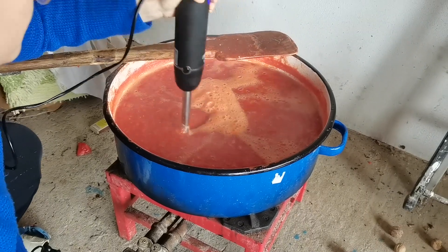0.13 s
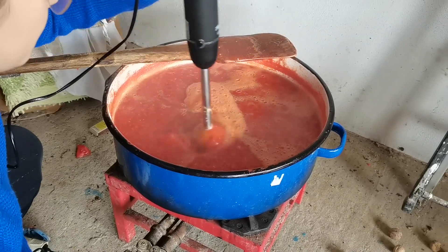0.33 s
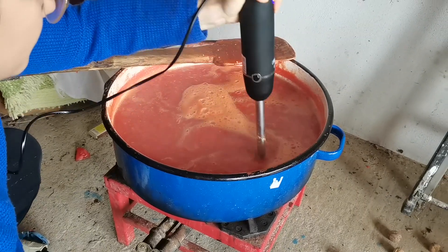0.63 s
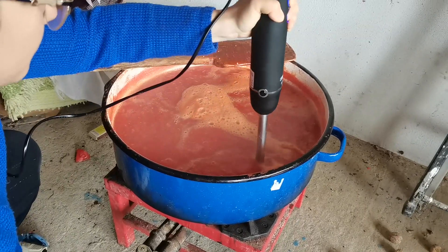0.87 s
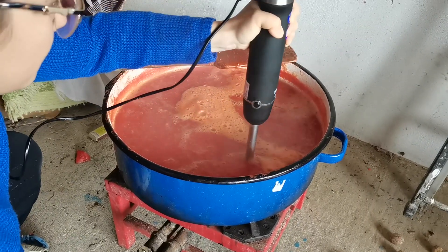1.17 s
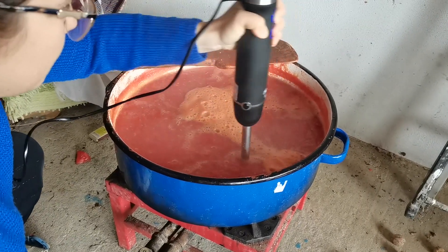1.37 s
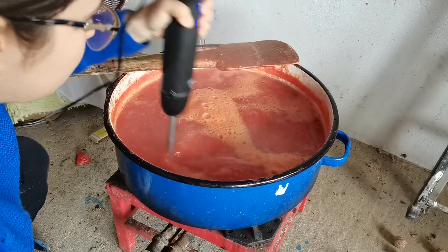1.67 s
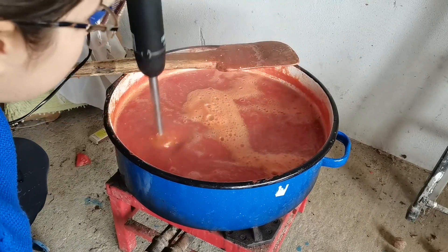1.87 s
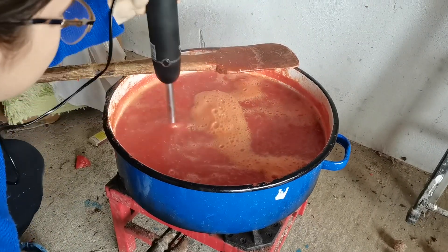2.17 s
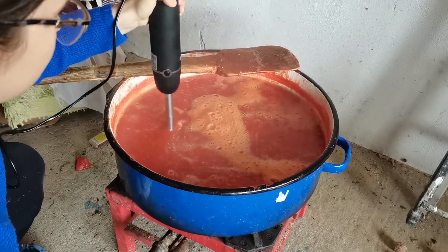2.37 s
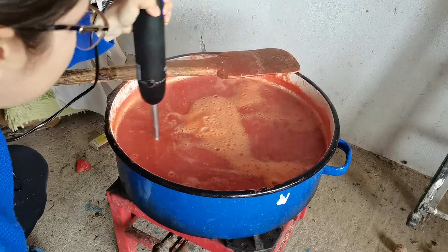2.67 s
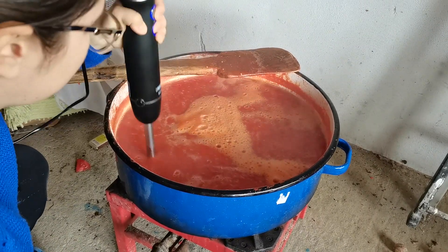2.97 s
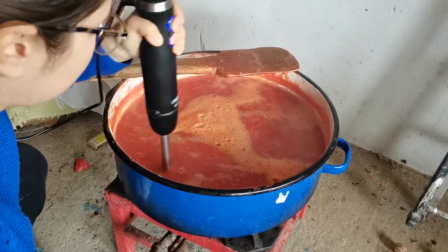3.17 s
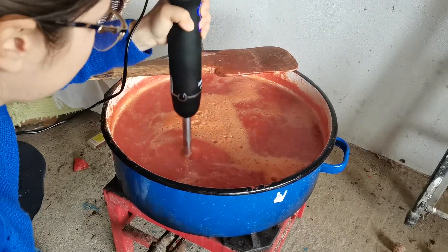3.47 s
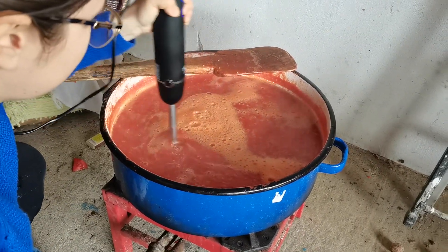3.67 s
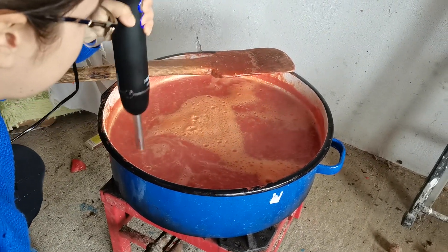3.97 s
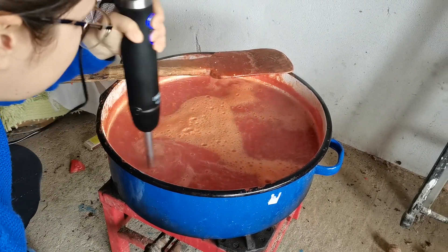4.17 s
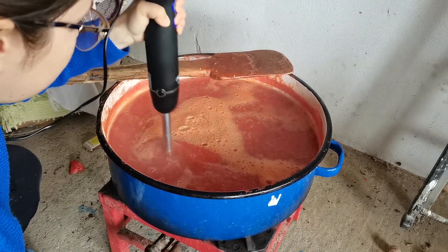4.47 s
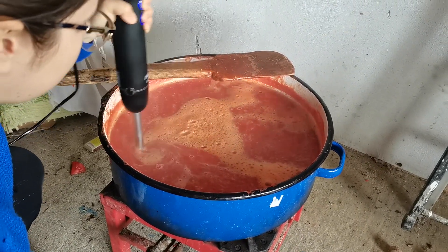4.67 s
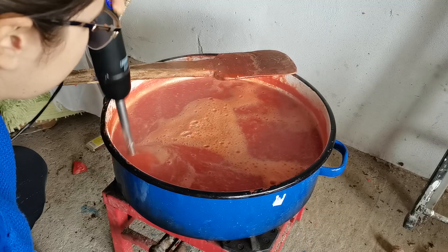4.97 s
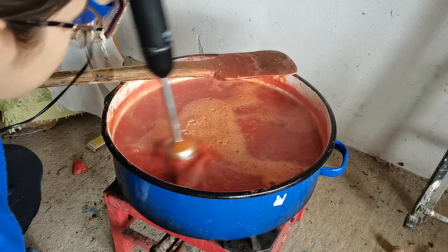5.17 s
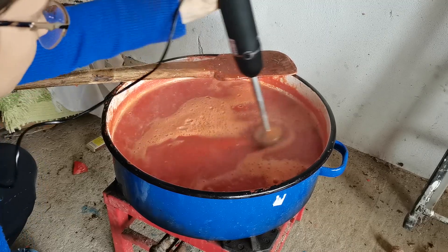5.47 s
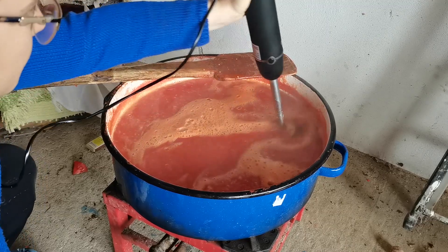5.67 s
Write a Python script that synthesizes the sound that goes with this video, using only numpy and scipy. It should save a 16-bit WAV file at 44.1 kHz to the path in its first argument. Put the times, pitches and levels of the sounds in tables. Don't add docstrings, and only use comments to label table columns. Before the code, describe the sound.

Close stereo pickup of a stick blender in a pot of thick red sauce. A falling whine opens, then a short burst with a hum and a sudden wet hiss, a glide down, a long stirring burst, and another run-down. Drops spatter and plop, and finally the lifted blades start up, lighter and drier. A gas flame rushes faintly beneath in a plain, fairly dry room.

```python
import sys
import numpy as np
from scipy import signal
from scipy.fft import rfft, irfft, next_fast_len
from scipy.io import wavfile
from scipy.ndimage import uniform_filter1d, map_coordinates

SR = 44100
rng = np.random.default_rng(int(sys.argv[2]) if len(sys.argv) > 2 else 0)


def boost(x):
    u = np.asarray(x, float) / 20
    return 10 ** u


def dump(signal):
    limited = np.clip(np.atleast_2d(signal).T, -1, 1)
    pcm = np.round(limited * 32767).astype(np.int16)
    wavfile.write(sys.argv[1], SR, pcm)


N = 256220


def unit(x):
    return x / np.sqrt(np.mean(x ** 2) + 1e-20)


def along(points, hz):
    f, v = np.transpose(points)
    return np.interp(np.log(hz + 1), np.log(f + 1), v)


def curves(rows, at=None):
    s, *cols = np.transpose(sorted(map(tuple, rows)))
    at = np.arange(N) / SR if at is None else at
    return [np.interp(at, s, c) for c in cols]


def wobble(rate_hz):
    knots = rng.standard_normal(int(N * 900 / SR) + 4)
    return map_coordinates(knots, [np.arange(N) * min(rate_hz, 900) / SR])


def rise(s, tau_s):
    return 1 - np.exp(-np.maximum(s, 0) / tau_s)


def bump(s, width_s):
    return np.exp(-(s / width_s) ** 2)


def filtered(x, response):
    m = next_fast_len(N + SR // 2)
    return irfft(rfft(x, m) * response(np.fft.rfftfreq(m, 1 / SR)), m)[..., :N]


# frequency in Hz, left-right correlation.
PORT_LIKENESS = [(60, 0.83), (180, 0.79), (550, 0.61), (1650, 0), (4970, 0.088), (15000, 0.15)]


def rush(spectrum, patchy_db):
    z = signal.stft(rng.standard_normal((2, N)), nperseg=512)[2]
    field = uniform_filter1d(rng.standard_normal(z.shape[1:]), size=8, axis=0)
    field = uniform_filter1d(field, size=8, axis=1)
    pair = signal.istft(z * boost(patchy_db * unit(field)), nperseg=512)[1][:, :N]

    def mid_side(hz):
        turn = np.arccos(np.clip(along(PORT_LIKENESS, hz), -1, 1)) / 2
        return boost(along(spectrum, hz)) * [np.cos(turn), np.sin(turn)]

    mid, side = filtered(pair, mid_side)
    return unit(np.array([mid + side, mid - side]))


def tone(phase, rough, width_hz, apart):
    skirt = np.array([wobble(width_hz) + 1j * wobble(width_hz) for port in range(2)])
    lag = apart * (wobble(2.98) + 1.15) * np.array([[1], [-1]])
    return unit(-np.real((1 + rough * skirt) * np.exp(1j * (phase - lag))))


# press in s, bell starts drawing air in s, release in s, lifted share 0-1.
PRESSES = [
    (-1, -.9, -.233, 0),
    (.593, .972, 1.207, 0),
    (2.011, 2.266, 4.646, 0),
    (5.593, 9, 9, 1),
]


def clocks():
    t = np.arange(N) / SR
    columns = np.transpose(PRESSES)
    latest = np.searchsorted(columns[0], t, "right") - 1
    press, air, release, lifted = columns[:, latest]
    return t - press, t - air, np.maximum(t - release, 0), np.minimum(t, release), lifted


# time in s, speed in rev/s.
LOADED_SPEED = [(.8, 225), (.96, 226), (1.04, 224), (1.1, 231), (1.21, 232), (2.25, 224.5), (2.3, 224),
                (2.4, 230), (2.5, 232.5), (2.7, 234.5), (3.0, 233.5), (3.15, 235.7), (3.9, 235.5),
                (4.63, 234.6), (5.76, 242), (5.81, 236)]
SPIN_UP_S, HEAD_START_S = (.037, .027), (.016, -.012)
DRAG_LOSS_REV_S, DRAG_S, FRICTION_REV_S2, CRAWL_REV_S = 72, .075, 320, 15


def shaft():
    on, air, off, held, lifted = clocks()
    head_start = np.interp(lifted, [0, 1], HEAD_START_S)
    share = np.maximum(rise(on + head_start, np.interp(lifted, [0, 1], SPIN_UP_S)), .05)
    driven = curves(LOADED_SPEED, held + 2 * (held < 0))[0] * share
    speed = driven - DRAG_LOSS_REV_S * rise(off, DRAG_S) - FRICTION_REV_S2 * off
    return np.maximum(speed, CRAWL_REV_S), 20 * np.log10(share)


# time in s, blade beat in dB, its 2nd partial in dB, its 3rd partial in dB.
STROKES = [
    [(.7, -14, -33, -39), (.806, -21, -30, -41), (.85, -16, -34, -35), (.934, -23.5, -26, -47.5),
     (1.038, -24, -46, -31), (1.088, -29.5, -17.5, -27), (1.152, -22.5, -39, -25),
     (1.21, -23.5, -20, -27.5)],
    [(2.11, -17, -22.5, -40.5), (2.24, -19, -31, -50), (2.37, -11, -13.5, -24.5), (2.48, -18.5, -26, -25.5),
     (2.65, -24, -11, -34.5), (2.8, -18.5, -30, -42), (2.95, -24.5, -15, -30), (3.11, -17.5, -33.5, -26),
     (3.2, -21.5, -35, -52), (3.28, -28, -19, -31), (3.4, -37, -28, -34.5), (3.55, -20.5, -31.5, -33),
     (3.65, -37.5, -31, -27), (3.71, -18, -28, -27.5), (3.8, -17, -19.5, -36), (4.24, -25.5, -27.5, -30),
     (4.48, -24.5, -25, -31.5), (4.58, -18, -20.5, -37.5)],
    [(5.728, -45, -59, -56), (5.784, -26.5, -55, -60), (5.81, -21, -39, -49)],
]
BEAT_POWER = (9, 6, 6)
BEAT_DROP_DB, BEAT_DROP_S, BEAT_FADE_DB_S2 = (10, 7, 18), .03, (560, 4000, 3000)
FADES_DB, FLUTTER_DB, DRY_DB = (1, 1.5, 2), 12, -46


def blade_levels(hiss_db, spin_db):
    on, air, off, held, lifted = clocks()
    choppy_s = .08
    drop = rise(off, BEAT_DROP_S)
    stumble = drop + bump(air - choppy_s / 2, choppy_s)
    strokes = curves([row for burst in STROKES for row in burst], held)
    beats = []
    for db, power, drop_db, fade, fades_db in zip(strokes, BEAT_POWER, BEAT_DROP_DB, BEAT_FADE_DB_S2, FADES_DB):
        level = db + power * spin_db - drop_db * drop - fade * off ** 2
        flutter = FLUTTER_DB * stumble * np.minimum(wobble(45), .2)
        beats.append(level + fades_db * wobble(9) + flutter)
    return beats + [hiss_db - 8 * drop, DRY_DB + 4 * spin_db - 80 * (1 - lifted)]


# multiple of shaft speed, level in dB against its driver,
# driver (0-2 blade partials, 3 hiss, 4 dry spin).
WEAK_ORDERS = [(1, -20, 0), (3, -23, 0), (5, -26, 1), (8, -1, 2), (7, -24, 3), (10, -13, 3), (7, 4, 4),
               (8, 1, 4), (12, -8, 4), (22, -5, 4), (24, 0, 4), (26, -5, 4)]


def blades(turns, drivers_db):
    orders = [(2 * k + 2, 0, k) for k in range(3)]
    orders += [(round(order), db, round(driver)) for order, db, driver in WEAK_ORDERS]
    total = 0
    for order, db, driver in orders:
        line = tone(order * turns, rough=0.079 * order, width_hz=10 * order, apart=min(0.04 * order, .45))
        total = total + boost(drivers_db[driver] + db) * line
    return total


WHINE_DB, MASKED_DB, BARS_DB = -34, -48, -70
WHINE_POWER, WHINE_FLUTTER_DB = 25, 2.5
FREED_S, FREED_DB, FREED_FADE_DB_S2 = .09, (-42.5, -48), (500, 360)


def whine_levels(spin_db):
    on, air, off, held, lifted = clocks()
    main = WHINE_DB + WHINE_POWER * np.minimum(spin_db + 1.1, 0) + (MASKED_DB - WHINE_DB) * rise(air, .02)
    freed = np.clip(off / FREED_S, 0, 1)
    levels = []
    for db, peak_db, fade in zip([main, BARS_DB], FREED_DB, FREED_FADE_DB_S2):
        level = db + (peak_db - db) * freed - fade * np.maximum(off - FREED_S, 0) ** 2
        levels.append(level + WHINE_FLUTTER_DB * freed * wobble(40))
    return levels


# harmonic of the bar rate, level in dB.
BAR_HARMONICS = [(3, -2), (4, -3), (5, -6), (6, -8), (8, -12)]


def brushes(turns, spin_db):
    bar_count = 24
    main_db, others_db = whine_levels(spin_db)

    def line(harmonic, width_hz):
        return tone(harmonic * bar_count * turns, rough=1.1, width_hz=width_hz, apart=.4)

    def housing(hz):
        return boost(.8 * np.maximum(along(HISS_SPECTRUM, hz), -30) + 5 - np.clip(hz / 500 - 23, 0, 9))

    others = sum(boost(db) * line(round(k), 300) for k, db in BAR_HARMONICS)
    return filtered(boost(main_db) * line(2, 600) + boost(others_db) * others, housing)


# time in s, hiss in dB.
FROTH = [(1.03, -20), (1.21, -18.5), (2.33, -22), (2.4, -23), (2.64, -20.5), (2.76, -24.5), (3.08, -22.5),
         (3.11, -27), (3.28, -21), (3.49, -23.5), (3.79, -21), (3.95, -27), (3.99, -25), (4.21, -23.5),
         (4.41, -23), (4.45, -22), (4.56, -22), (4.64, -22)]
SUNK_DB, LIFTED_DB, SWELL_DB, SWELL_S = -36.5, -4.5, (13, 16.5), 0.043
GULP_AFTER_S, GULP_S, GULP_DB = .031, .013, 9
HISS_DROP_DB, HISS_DROP_S, HISS_FADE_DB_S = 11, 0.088, 87


def hiss_level():
    on, air, off, held, lifted = clocks()
    swell_db = np.interp(lifted, [0, 1], SWELL_DB) * (1 - rise(on, SWELL_S))
    sunk = SUNK_DB + LIFTED_DB * lifted - swell_db - 40 * (1 - rise(on, .001))
    frothy = curves(FROTH, held + 3 * (held < 0))[0] - GULP_DB * bump(air - GULP_AFTER_S, GULP_S)
    running = sunk + (frothy - sunk) * rise(air, 0.0022)
    return running - HISS_DROP_DB * rise(off, HISS_DROP_S) - HISS_FADE_DB_S * off


# frequency in Hz, density in dB per Hz.
HISS_SPECTRUM = [(1180, -37.5), (2000, -11), (2320, -9.5), (2550, -11.5), (2830, -12), (3010, -13),
                 (3490, -12.5), (3650, -12), (4190, -9.5), (4900, -17.5), (7510, -4), (8930, -18),
                 (10100, -9), (14700, -13), (16000, -18.5)]
# frequency in Hz, level in dB.
RASP_SHARE = [(2000, 0), (4500, 0), (6500, -5), (9000, -9), (16000, -14)]


def rasp(turns, memory_passes):
    passes = turns / np.pi
    patterns = rng.standard_normal((2, 900, 96))
    where = [passes / memory_passes, passes % 1 * 96]
    tear = np.array([map_coordinates(p, where, order=1, mode="grid-wrap") for p in patterns])
    return unit(filtered(tear, lambda hz: boost(along(HISS_SPECTRUM, hz) + along(RASP_SHARE, hz))))


# running level in dB, lifted change in dB, start surge (negative: dip) in dB,
STIRRED = [
    (-37, -11, -3, 8, 83),
    (-48, -4, 8.5, 8.5, 32),
]
STIR_RISE_S, SURGE_S, GULP_SURGE_S, LUMPY_DB = 0.032, 0.14, 0.062, 0.72


def stir_levels():
    on, air, off, held, lifted = clocks()
    quick = 1 - lifted / 2
    levels = []
    for db, lifted_db, start_db, gulp_db, fade in STIRRED:
        level = db + lifted_db * lifted - 45 * (1 - rise(on, STIR_RISE_S * quick)) - fade * off
        start = start_db * bump(on - SURGE_S * quick, SURGE_S * quick)
        gulp = gulp_db * bump(air - .03, GULP_SURGE_S)
        levels.append(level + start + gulp + LUMPY_DB * wobble(6))
    return levels


# frequency in Hz, density in dB per Hz.
SLOSH_SPECTRUM = [(150, -32.5), (300, -9.5), (430, 5), (520, -4.5), (580, -13), (680, -4.5), (770, -3),
                  (1000, 3.5), (1230, -6), (1450, -1), (1900, -6), (2400, -10.5), (3500, -24.5),
                  (5000, -79)]
# frequency in Hz, density in dB per Hz.
RUMBLE_SPECTRUM = [(40, -36), (80, -5), (180, -5), (300, 0), (420, -60)]


def churn(turns, hiss_db):
    slosh_db, rumble_db = stir_levels()
    puffs = 1 + .15 * np.sin(2 * turns + .8 * wobble(20))
    lumps = boost(1.0 * wobble(24.72) + 0.28 * wobble(150))
    rasp_share = .5 * np.clip((hiss_db + 36) / 12, .2, 1)
    torn = rush(HISS_SPECTRUM, patchy_db=1.5) + rasp_share * rasp(turns + .03 * wobble(40), memory_passes=5)
    hiss = unit(puffs * lumps * torn)
    sparkle = filtered(hiss, lambda hz: np.clip((hz - 11000) / 2500, 0, 1))
    dulling = 1 - boost(np.clip(0.83 * (hiss_db + 13), -12, 0))
    slosh = unit(boost(.9 * wobble(18)) * rush(SLOSH_SPECTRUM, patchy_db=1.8))
    rumble = rush(RUMBLE_SPECTRUM, patchy_db=3.5)
    return boost(hiss_db) * (hiss - dulling * sparkle) + boost(slosh_db + 10) * slosh + boost(rumble_db + 2.5) * rumble


# time in s,
# peak in dB, plop against it in dB, spatter t60 in s.
DROPS = [(.012, -38, -15, .05), (1.559, -41, -0.5, 0.041), (5.0853, -59, 29, 0.05),
         (5.1237, -43, 9.5, 0.066), (5.1444, -42.5, 3.5, 0.05), (5.1564, -50, -11.5, 0.05),
         (5.175, -49, -1, 0.05), (5.1892, -44.5, -8, 0.072), (5.2042, -29, -26, 0.04),
         (5.2155, -34.5, -8.5, 0.16), (5.243, -38.5, -3, 0.04), (5.2835, -50, -7.5, 0.067),
         (5.631, -53, 27.5, 0.05)]


def drops():
    bright, dull, t = np.zeros(N + SR), np.zeros(N + SR), np.arange(SR // 4) / SR
    for s, db, plop_db, t60_s in DROPS:
        start = round(s * SR)
        bright[start:][:len(t)] += boost(db - 8.5 - 60 * t / t60_s)
        dull[start:][:len(t)] += boost(db + plop_db - 9.5 - 60 * t / 0.13) * rise(t, 0.0042)
    spatter = [(1500, -28), (3200, -1.5), (7000, 2), (9000, -6), (11000, -9), (15500, -22), (16500, -59)]
    plop = [(90, -22), (300, 4.0), (1100, -11.5), (2500, -14), (6000, -51.5)]
    return bright[:N] * rush(spatter, patchy_db=1.5) + dull[:N] * rush(plop, patchy_db=1.5)


# time in s, rush in dB.
FLAME_LEVEL = [(0, -59.5), (.6, -54), (1.5, -49), (2.0, -45.5), (4.9, -47.5), (5.81, -58.5)]
# frequency in Hz, density in dB per Hz.
FLAME_SPECTRUM = [(60, -23), (110, -3), (230, -2.5), (380, -12.5), (600, -11.5), (1050, -6), (1600, -8),
                  (2400, -16.5), (3300, -29), (7500, -36.5), (9000, -55.5), (10500, -48), (15500, -53.5)]
DRONE_DB, DRONE_SWELL_DB, DRONE_AT_S, DRONE_S = -63, 17, 2.85, .7


def burner():
    drone = rush([(30, -41), (46, -7), (53, 10.5), (60, -5), (90, -60.0)], patchy_db=-6.0)
    drone_db = DRONE_DB + DRONE_SWELL_DB * bump(np.arange(N) / SR - DRONE_AT_S, DRONE_S)
    flame = boost(.7 * wobble(12)) * rush(FLAME_SPECTRUM, patchy_db=1.1)
    return boost(curves(FLAME_LEVEL)[0]) * flame + boost(drone_db) * drone


def scene():
    speed, spin_db = shaft()
    turns = 2 * np.pi * np.cumsum(speed) / SR
    hiss_db = hiss_level() + 3
    shake_rad = .07 + .45 * rise(clocks()[2], BEAT_DROP_S)
    shaken = turns + shake_rad * wobble(40)
    motor = blades(shaken, blade_levels(hiss_db, spin_db)) + brushes(turns, spin_db)
    return motor + churn(turns, hiss_db) + drops() + burner()


def band_limit(x):
    return signal.sosfilt(signal.butter(12, 16400, fs=SR, output="sos"), x)


# frequency in Hz, left minus right in dB.
PORT_BALANCE = [(60, 15), (110, 6), (200, 5.5), (380, -0.5), (700, 1), (1290, 2), (2380, -1.0), (4400, 0.0),
                (8120, 2.5), (15000, 6.5)]


def record(dry):
    top_hz = 15800
    ports = filtered(dry, lambda hz: boost(along(PORT_BALANCE, hz) * [[.5], [-.5]]) * (hz < top_hz))
    return band_limit(np.clip(ports, -1, 1))


dry = scene()
out = record(dry)
dump(out)
```